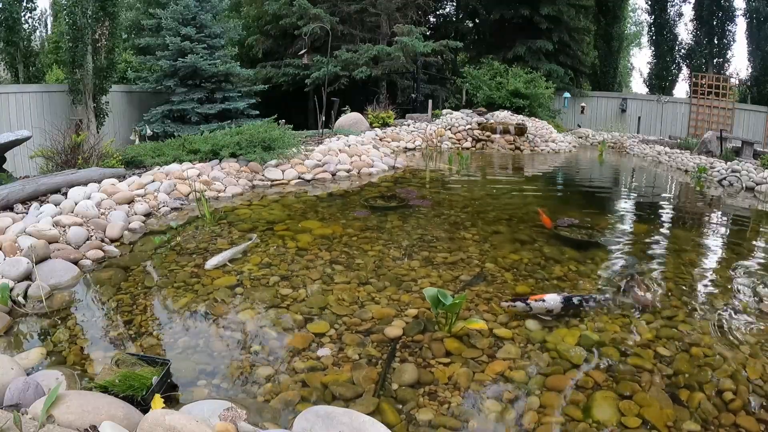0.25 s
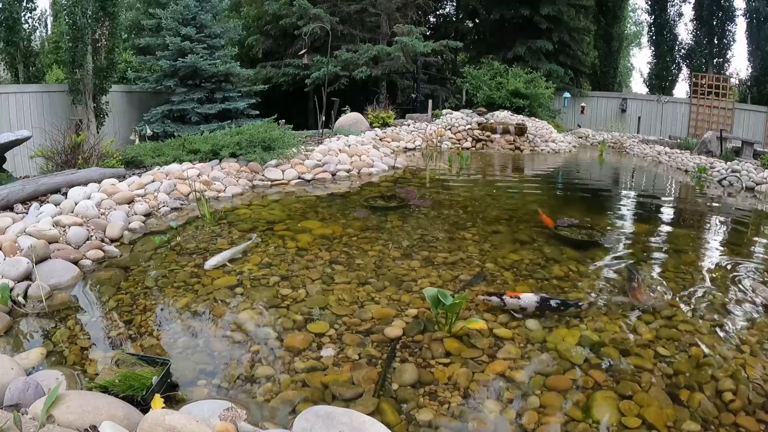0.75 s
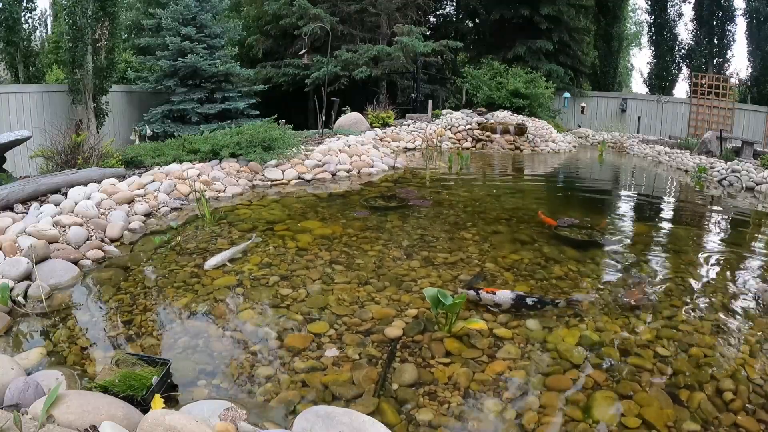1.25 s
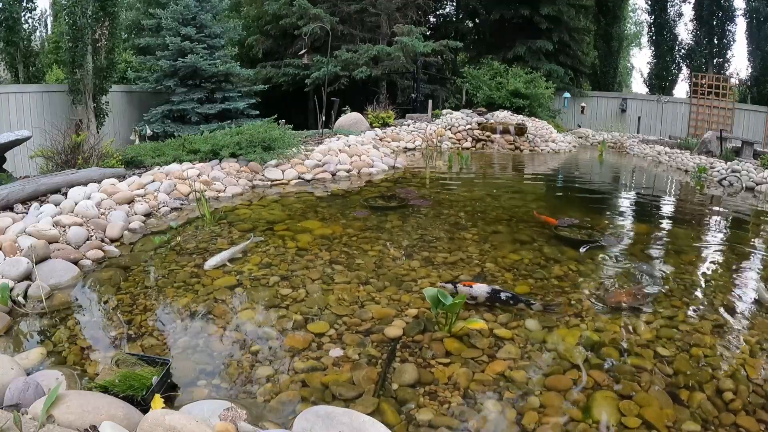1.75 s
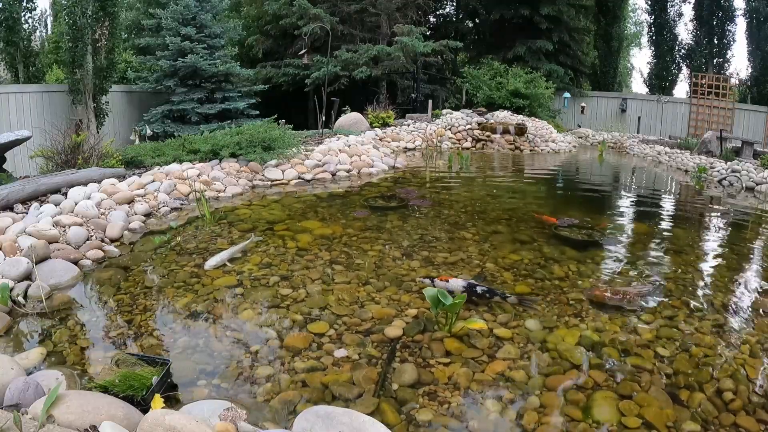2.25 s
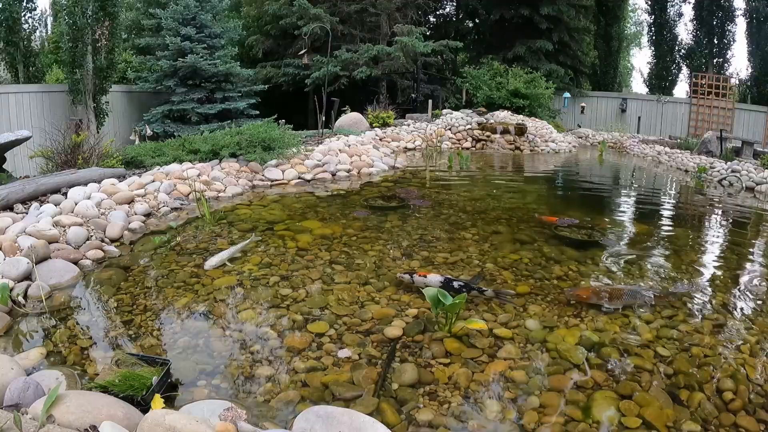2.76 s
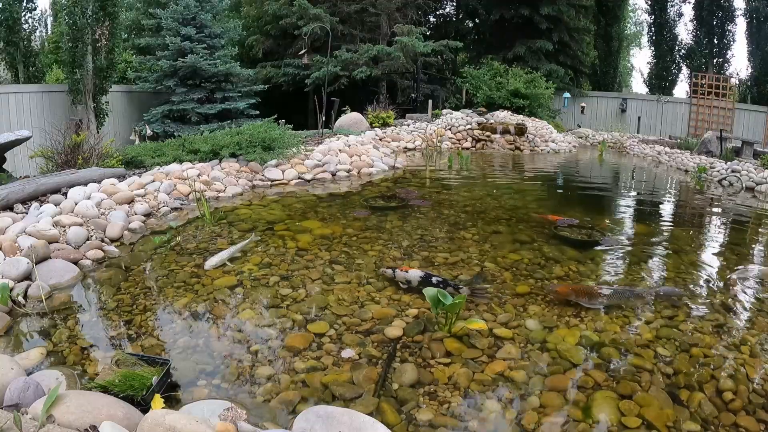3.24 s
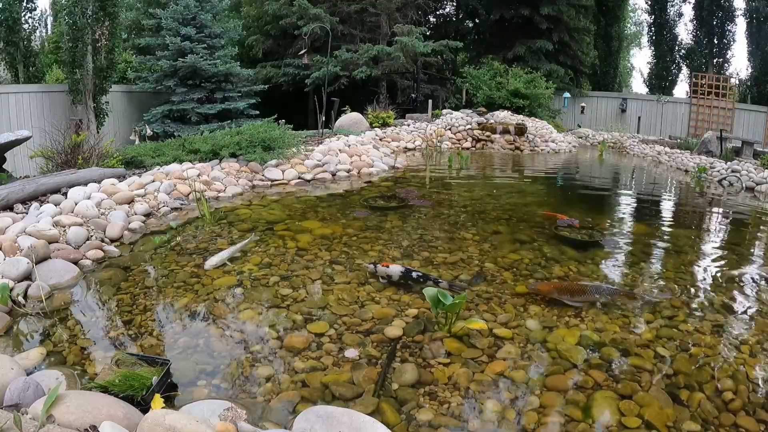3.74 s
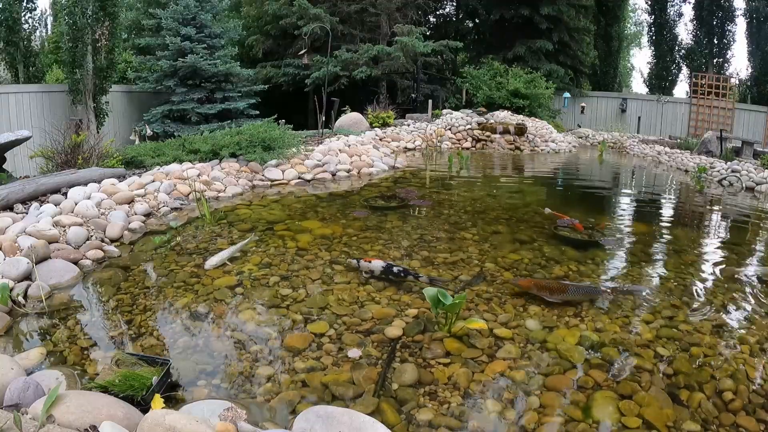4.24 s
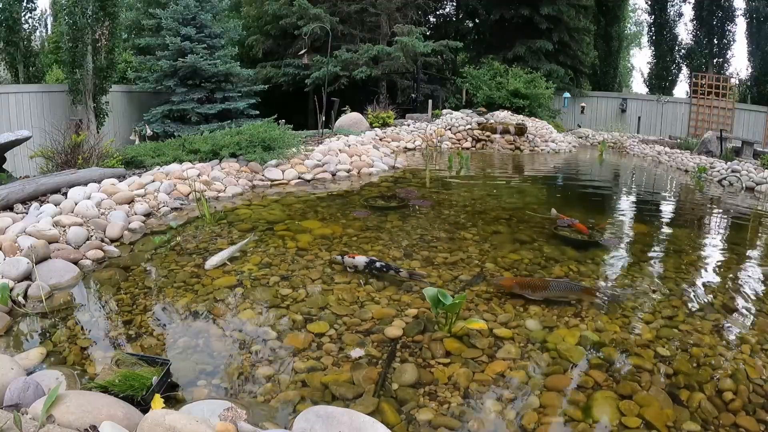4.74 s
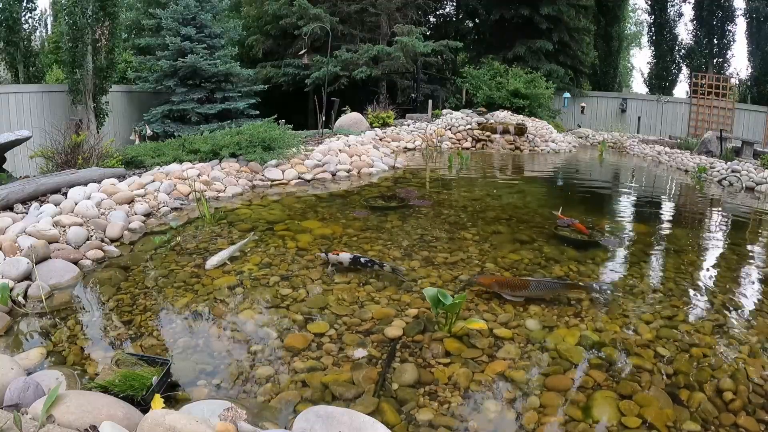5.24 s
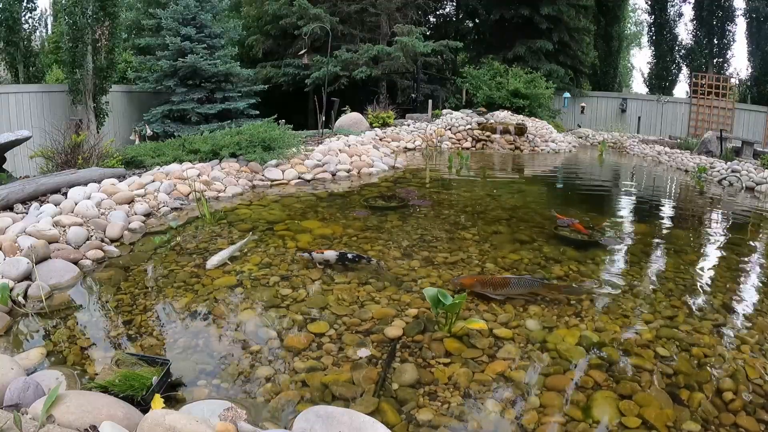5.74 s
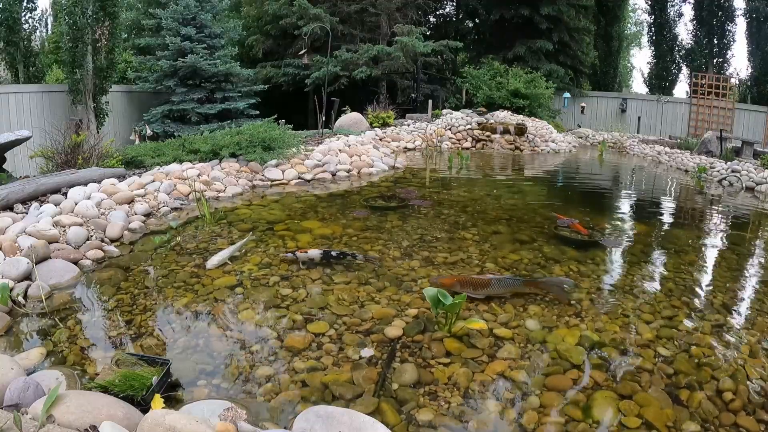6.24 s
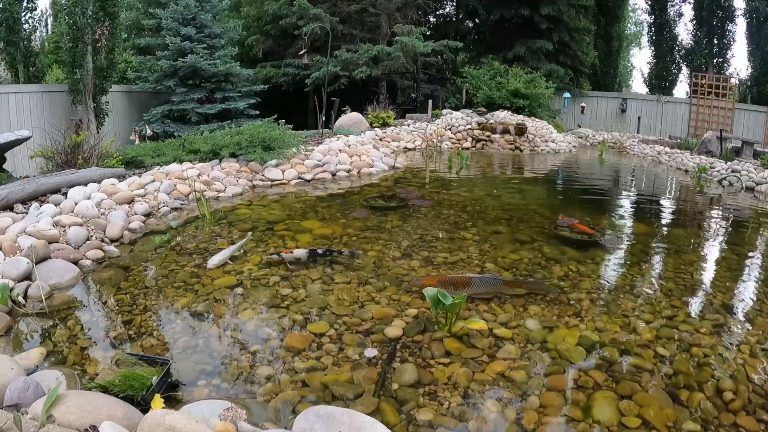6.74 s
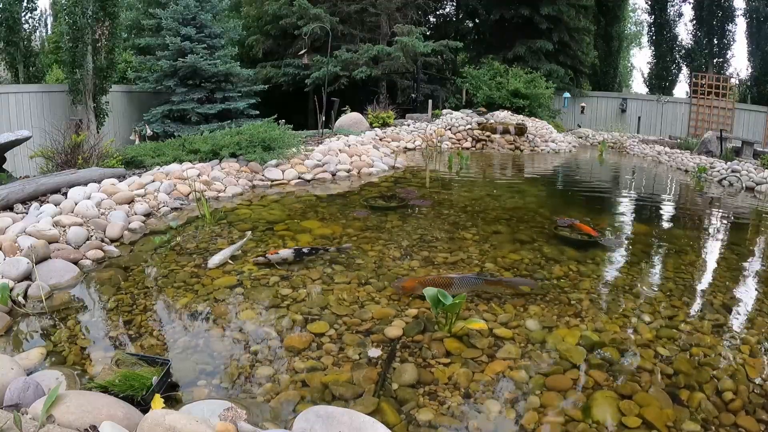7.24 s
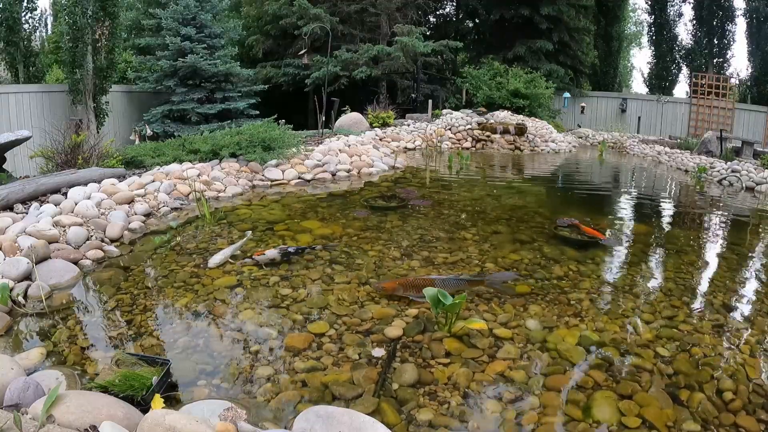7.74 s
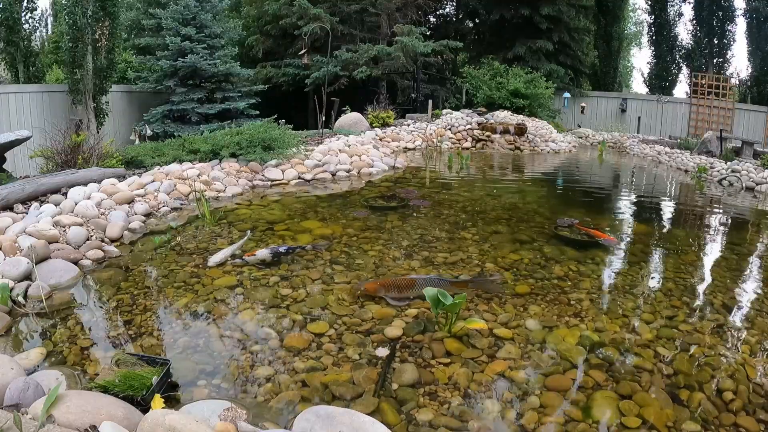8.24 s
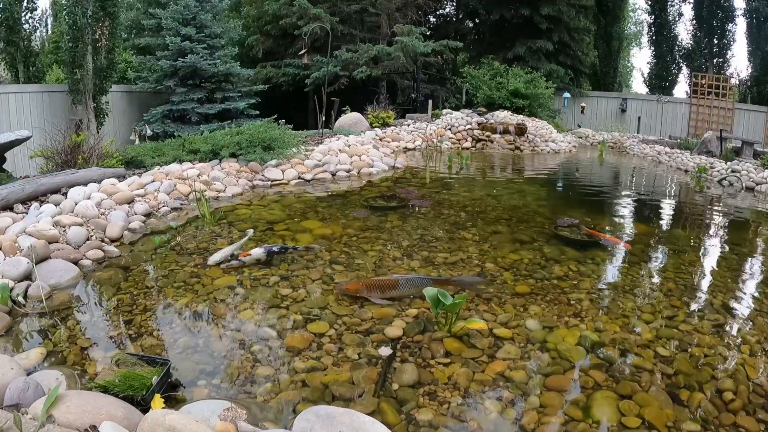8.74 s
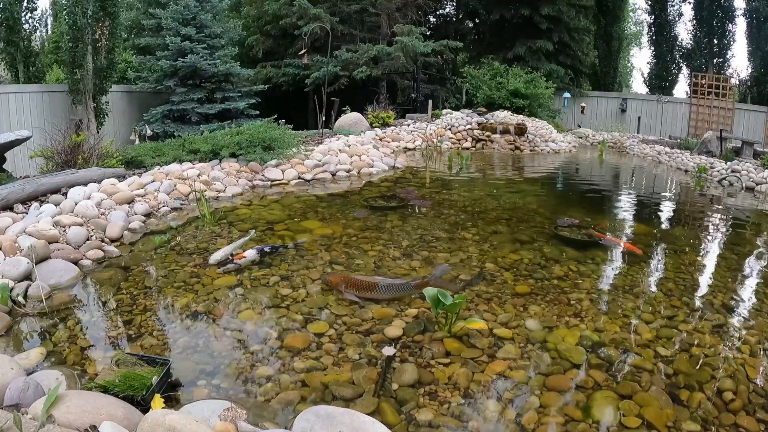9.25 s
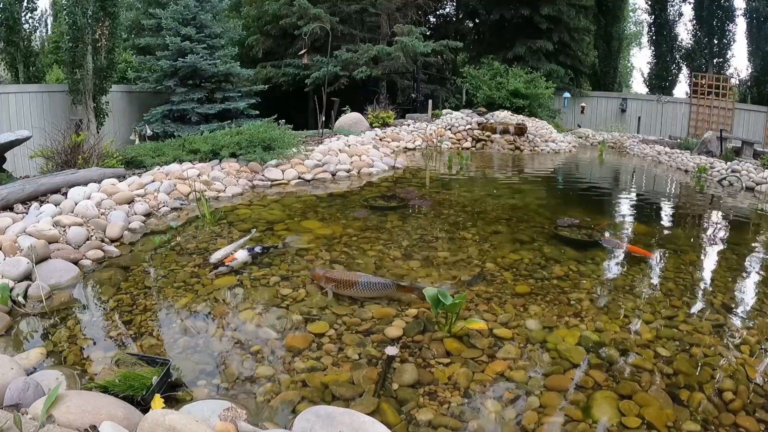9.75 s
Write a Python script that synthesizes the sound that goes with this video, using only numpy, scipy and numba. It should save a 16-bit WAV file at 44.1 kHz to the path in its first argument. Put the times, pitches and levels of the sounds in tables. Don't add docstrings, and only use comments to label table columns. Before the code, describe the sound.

Unbroken splashing of a little garden cascade, bright droplets and bubbly plops standing out, over low, uneven wind buffeting against the microphone.

```python
import sys
import numpy as np
from scipy import signal
from scipy.fft import rfft, irfft, next_fast_len
from scipy.io import wavfile
from scipy.ndimage import uniform_filter1d, map_coordinates
from numba import njit

SR = 44100
rng = np.random.default_rng(int(sys.argv[2]) if len(sys.argv) > 2 else 0)


def convert_level_to_amplitude(level_db):
    exponent = np.asarray(level_db, float) / 20
    return 10 ** exponent


def digitize_waveform(pressure):
    field = np.atleast_2d(pressure).T
    bounded = np.clip(field, -1, 1)
    quanta = np.round(bounded * 32767).astype(np.int16)
    wavfile.write(sys.argv[1], SR, quanta)


N = 440559

# pitch_hz, level_db (per Hz)
SPRAY_COLOUR = [(2000, -20.5), (3400, -4), (5580, -6), (8230, -17.5), (12000, -25.5), (13700, -33),
                (14900, -48)]


def waterfall():
    # middle_s, change_db (over the steady flow)
    gushes = [(1.5, 4), (1.58, 1), (1.69, -3.5), (1.78, 2), (2.0, 1.5), (2.28, 2), (2.84, 1.5),
              (3.066, -1.5), (3.25, 1), (3.92, 1), (4.9, 0.5), (5.06, 3.5), (5.73, 3.5), (7.02, -1.5),
              (7.51, -1.5), (7.73, 2.5), (8.24, 0.5), (8.93, 1), (8.97, -2.5), (9.88, -1), (9.93, 4.5)]
    # pitch_hz, level_db (per Hz)
    splash_colour = [(250, -40), (450, -4), (720, -4.5), (910, -0.5), (1080, -2), (1230, 0.5), (1420, -2),
                     (1950, 0.5), (2340, -4), (2570, -2), (2800, -5.5), (3500, -8), (5000, -20),
                     (9000, -59)]
    splash_db, spray_db = -40.5, -48.5
    gush_db = swells(*np.transpose(gushes), half_s=0.016)
    surge = wobble(24) + 0.3 * wobble(55) + 1.1 * wobble(130)

    bubbles = crowd(count=18000, lo_hz=446.6, hi_hz=5180, cycles=4.28, spread_db=2.3,
                    clump_db=1.8 * surge, rise=0.13)
    bells = crowd(count=2500, lo_hz=704.7, hi_hz=9016, cycles=13.1, spread_db=2.3,
                  clump_db=1.0 * surge, rise=0.0677)
    fizz = crowd(count=16000, lo_hz=3215, hi_hz=14700, cycles=5.6, spread_db=2.0,
                 clump_db=2.2 * surge, rise=0.035)
    when, big = rng.random((1500, 2)).T
    crackle = unit(slaps(when * (N - 1) / SR, -3.2 * np.log(1.005 - big), t60=0.0058))

    splash = convert_level_to_amplitude(-3.5) * bubbles + convert_level_to_amplitude(-9) * bells + convert_level_to_amplitude(-11) * crackle
    splash += convert_level_to_amplitude(0.13 * surge) * patchy(0.69)
    splash = steadied(coloured(splash, splash_colour), seconds=0.095, share=0.35)
    spray = convert_level_to_amplitude(-4.5) * fizz + convert_level_to_amplitude(-10) * bells + convert_level_to_amplitude(-6.5) * crackle
    spray += convert_level_to_amplitude(0.25 * surge) * patchy(1.0)
    spray = steadied(coloured(spray, SPRAY_COLOUR), seconds=0.15, share=0.5)
    return convert_level_to_amplitude(splash_db + gush_db) * splash + convert_level_to_amplitude(spray_db + 0.086 * gush_db) * spray


def plops():
    # start_s, peak_db, pitch_hz, slap_db (above peak)
    big_bubbles = [(8.789, -29, 1050, 1), (0.402, -23, 1065, -5), (0.678, -24, 1210, 1),
                   (0.871, -20.5, 2500, -11), (8.232, -28, 1300, -10), (1.566, -23, 1210, -10),
                   (1.585, -19, 2180, -1), (1.995, -19.5, 2160, -4), (2.13, -22, 1840, -6),
                   (2.627, -26, 900, 3), (2.816, -25, 926, -6), (3.362, -24.5, 1090, 0),
                   (3.456, -23, 1105, -16), (3.57, -20.5, 1174, -12), (3.905, -24, 870, -1),
                   (3.976, -22.5, 2540, -5), (4.069, -22, 1770, -2), (4.163, -23, 1680, -5),
                   (4.864, -24, 1980, -8), (5.181, -23, 1940, -12), (5.444, -19.5, 2530, -9),
                   (6.369, -20, 1870, -9), (6.615, -23, 1940, -2), (7.035, -19.5, 1760, -2),
                   (7.509, -14, 880, -9), (8.218, -20, 2060, -10), (8.876, -23, 1150, -12),
                   (9.196, -22.5, 1190, -1), (9.374, -24, 1180, -9), (9.723, -24, 1340, 2)]
    # pitch_hz, level_db (per Hz)
    slap_colour = [(500, -52), (1000, 9), (2000, -4.5), (4000, -6), (9000, -40)]
    s, db, hz, slap_db = np.transpose(big_bubbles)
    t60 = 0.042 * (1000 / hz)
    life = np.clip(t60, .005, .2) / np.log(1000)
    rise = 0.092 * np.clip((-17.5 - db) / 6, .15, 1)
    ringing = ring(N, SR, s, hz, convert_level_to_amplitude(db - 6.5), life, rise, 0.15)
    slapping = slaps(s, db + slap_db + 2.5, t60=0.011)
    return ringing + filtered(slapping, lambda hz: convert_level_to_amplitude(along(slap_colour, hz)))


def ticks():
    # start_s, peak_db, pitch_hz
    droplets = [(0.19, -14, 3070), (4.065, -24, 2700), (0.7836, -19, 3650), (1.978, -18, 3030),
                (2.254, -16, 3160), (2.588, -25, 2880), (2.759, -17, 3470), (3.387, -15, 3010),
                (3.414, -15, 3050), (3.6013, -17, 5100), (3.7, -17, 3770), (4.6917, -19, 3670),
                (5.0734, -15.5, 4170), (5.3756, -15, 4470), (5.7274, -16, 2870), (5.9529, -18, 4520),
                (6.8367, -19, 3540), (7.026, -18, 4240), (7.043, -12.5, 3380), (7.254, -13, 3150),
                (8.08, -20, 2980), (8.419, -17, 4510), (8.5779, -17, 3000), (8.7166, -22, 3290),
                (8.792, -14, 4040), (8.8176, -20, 3680), (9.1855, -21, 2980), (9.5347, -19, 3330),
                (9.761, -17, 3150), (9.846, -15, 5760)]
    # start_s, peak_db
    sparks = [(0.1789, -47), (0.4692, -45), (1.4191, -49), (1.8511, -41), (2.108, -44), (2.7226, -44),
              (3.012, -46), (3.0723, -43), (3.1526, -49), (3.45, -46), (3.5567, -48), (4.4432, -42),
              (5.0897, -45), (5.2199, -38), (5.3087, -43), (5.9692, -48), (6.5579, -44), (6.8363, -36),
              (7.149, -51), (7.6843, -50), (7.9243, -47), (7.9871, -48), (8.063, -48), (8.3847, -50),
              (8.5783, -44), (9.0647, -39), (9.192, -47), (9.2268, -49)]
    # pitch_hz, level_db (per Hz)
    mist_colour = [(5000, -18), (8000, 6), (12000, -7), (15000, -18)]
    s, db, hz = np.transpose(droplets)
    ringing = ring(N, SR, s, hz, convert_level_to_amplitude(db - 8.0), 3.3 / hz, 0 * hz, 0.83)
    slapping = filtered(slaps(s, db - 5.0, t60=0.0054), lambda hz: convert_level_to_amplitude(along(SPRAY_COLOUR, hz)))
    s, db = np.transpose(sparks)
    bursting = filtered(slaps(s, db + 7.5, t60=0.0045), lambda hz: convert_level_to_amplitude(along(mist_colour, hz)))
    return ringing + slapping + bursting


def wind():
    # time_s, strength_db, sharpness_db (flutter over buffet)
    gusts = [(0, -30, -9.5), (.45, -30, -8), (.8, -25.5, -11), (1.2, -33, -1.5), (1.8, -31.5, -3),
             (2.3, -34, -2), (2.95, -34, -8.5), (3.4, -32, -6.5), (4.1, -31.5, 0), (4.6, -33.5, -3),
             (5.1, -41, -4), (5.55, -32, -8), (5.95, -28, -6), (6.45, -38, -3.5), (6.7, -25.5, -11),
             (7.2, -29, -9), (8.1, -28, -9), (9.99, -31.5, -8.5)]
    # middle_s, change_db (over the wind)
    eddies = [(.53, 4), (.59, -14), (.89, 4), (.95, -2.5), (1.62, -2.5), (1.87, 2), (2.28, -6), (2.39, 5),
              (2.87, -4), (3.34, 6.5), (3.73, 3), (3.95, -3), (4.0, 9.5), (4.23, 1.5), (4.78, 7),
              (4.87, -5), (5.03, 6), (5.81, -8), (5.86, 2.5), (6.29, 9), (6.59, 4), (6.73, 2), (6.79, -13),
              (6.87, 0.5), (7.37, 0.5), (7.43, -2), (8.07, 5.5), (8.12, -6), (8.68, -12), (8.76, 3.5)]
    # middle_s, change_db (over the flutter)
    flares = [(.61, 8), (.78, 4), (1.5, 4), (1.7, -4.5), (2.2, -9), (2.73, -7), (3.39, 7), (3.62, -17),
              (3.73, 4.5), (3.84, 4), (3.92, 0), (4.35, 5.5), (5.93, 2.5), (6.59, 5), (6.76, -10),
              (7.03, 6), (7.15, -1), (7.65, -2), (8.46, -2), (8.57, -9), (8.8, 3), (9.68, -4)]
    # pitch_hz, level_db (per Hz)
    buffet_colour = [(12, -49), (24, -8), (33, -2.5), (43, 2.5), (58, -4), (75, -0.5), (115, -7),
                     (160, -14), (210, -31.5), (350, -120)]
    # pitch_hz, level_db (per Hz)
    flutter_colour = [(65, -15), (110, -0.5), (204, -8), (286, -22.5), (450, -27.5), (580, -41),
                      (990, -120)]
    strength_db, sharp_db = curves(gusts)
    eddy_db = swells(*np.transpose(eddies), half_s=0.022)
    flare_db = swells(*np.transpose(flares), half_s=0.024)

    buffet = steadied(coloured(rng.standard_normal(N), buffet_colour), seconds=0.081, share=0.86)
    buffet_db = strength_db + eddy_db + 0.84 * wobble(5) + 1.0
    flutter = steadied(coloured(rng.standard_normal(N), flutter_colour), seconds=0.14, share=0.3)
    flutter_db = strength_db + sharp_db + 0.072 * eddy_db + flare_db + 0.99 * wobble(7.6)
    rumble = convert_level_to_amplitude(buffet_db) * buffet + convert_level_to_amplitude(flutter_db) * flutter
    return rumble * convert_level_to_amplitude(np.array([[.24], [-.24]]))


def whoosh():
    # middle_s, change_db (over the lightest air), half_length_s
    sweeps = [
        (0.102, 10, 0.24),
        (0.795, 9, 0.13),
        (1.304, 12, 0.33),
        (2.296, 4.5, 0.42),
        (2.85, 3.5, 0.079),
        (3.35, 2, 0.088),
        (4.2, 6.5, 0.6),
        (5.92, 5.5, 0.22),
    ]
    # pitch_hz, level_db (per Hz)
    air_colour = [(150, -1), (260, 6), (450, -3.5), (650, -7), (1000, -29), (1600, -120)]
    lightest_db = -52
    return convert_level_to_amplitude(lightest_db + swells(*np.transpose(sweeps))) * coloured(patchy(1.8), air_colour)


def ports(x):
    # pitch_hz, likeness (0 to 1)
    alike = [(200, .96), (400, .94), (750, .9), (1500, .93), (3000, .92), (4200, .97), (6500, .94),
             (7200, .68), (8200, .58), (10000, .68), (11200, .86), (12000, .58), (14500, .6)]
    # pitch_hz, level_db
    lean = [(100, .45), (450, 1.1), (800, -1.1), (1700, -3.2), (1950, -1.9), (2300, -3.4), (2650, -1),
            (3200, -2.6), (4300, -.4), (5300, -1.8), (6600, -.4), (8500, -3), (11500, 1.8), (13500, -1.1)]
    # pitch_hz, lead_radians
    lead = [(100, 0), (900, -.45), (1400, -.45), (1750, -.2), (3000, -.22), (3900, -.04), (6700, -.07),
            (7450, -.45), (9400, .32), (11200, .04), (12000, .3), (13000, 0)]
    z = signal.stft(x, nperseg=256)[2]
    random_phase = np.exp(2j * np.pi * rng.random(z.shape))
    scattered = signal.istft(z * random_phase, nperseg=256)[1][:N]
    scattered = scattered * np.std(x) / np.std(scattered)

    def shares(hz):
        turn = np.arccos(np.clip(along(alike, hz), 0, 1)) / 2
        return np.array([np.cos(turn), np.sin(turn)])

    def tilts(hz):
        tilt = convert_level_to_amplitude(along(lean, hz) / 2) * np.exp(.5j * along(lead, hz))
        return np.array([tilt, 1 / tilt])

    mid, side = filtered(np.array([x, scattered]), shares)
    return filtered(np.array([mid + side, mid - side]), tilts)


def crowd(count, lo_hz, hi_hz, cycles, spread_db, clump_db, rise):
    when, pitch, big, long = rng.random((count, 4)).T
    s = when * (N - 1) / SR
    hz = lo_hz * (hi_hz / lo_hz) ** pitch
    size_db = clump_db[(s * SR).astype(int)] - spread_db * np.log(1.006 - big)
    life = cycles * (0.4 + 0.966 * long) / hz
    return unit(ring(N, SR, s, hz, hz * convert_level_to_amplitude(size_db), life, 2 * rise * long, 0.37))


@njit
def ring(n, sr, s, hz, size, life, rise, onset):
    out = np.zeros(n)
    for g in range(len(s)):
        first = int(s[g] * sr)
        for i in range(min(int(5 * life[g] * sr) + 2, n - first)):
            t = i / sr
            turn = hz[g] * t * (1 + rise[g] * t / (2 * life[g]))
            loudness = size[g] * np.exp(-t / life[g]) * (1 - np.exp(-turn / onset))
            out[first + i] += loudness * np.sin(2 * np.pi * turn)
    return out


def slaps(s, db, t60):
    t = np.arange(SR // 50) / SR
    shape = convert_level_to_amplitude(db[:, None] - 60 * t / t60) * (1 - np.exp(-t / 0.00017))
    puffs = shape * rng.standard_normal((len(s), len(t)))
    places = (s * SR).astype(int)[:, None] + np.arange(len(t))
    return np.bincount(places.ravel(), puffs.ravel(), N + SR)[:N]


def patchy(patchy_db):
    z = signal.stft(rng.standard_normal(N + 512), nperseg=256)[2]
    field = uniform_filter1d(rng.standard_normal(z.shape), 8, 0)
    field = uniform_filter1d(field, 8, 1)
    return unit(signal.istft(z * convert_level_to_amplitude(patchy_db * unit(field)), nperseg=256)[1][:N])


def swells(s, db, half_s):
    t = np.arange(0, N, 64) / SR
    bells = np.exp(-.5 * ((t - s[:, None]) / np.reshape(half_s, (-1, 1))) ** 2)
    return np.interp(np.arange(N) / SR, t, db @ bells)


def steadied(x, seconds, share):
    power = np.abs(uniform_filter1d(x ** 2, int(seconds * SR)))
    return unit(x / (power + 0.11) ** (np.clip(share, 0, 1) / 2))


def wobble(rate):
    return map_coordinates(rng.standard_normal(4000), [np.arange(N) * rate / SR])


def curves(rows):
    s, *cols = np.transpose(rows)
    return [np.interp(np.arange(N) / SR, s, c) for c in cols]


def along(points, hz):
    f, v = np.transpose(points)
    return np.interp(np.log(hz + 1), np.log(f + 1), v)


def filtered(x, response):
    m = next_fast_len(N + 8192)
    return irfft(rfft(x, m) * response(np.fft.rfftfreq(m, 1 / SR)), m)[..., :N]


def coloured(x, spectrum):
    return unit(filtered(x, lambda hz: convert_level_to_amplitude(along(spectrum, hz))))


def unit(x):
    return x / np.sqrt(np.mean(x ** 2) + 1e-20)


def scene():
    water = waterfall() + plops() + ticks()
    return ports(water + whoosh()) + wind()


def band_limit(x):
    return signal.sosfilt(signal.butter(12, 15060, fs=SR, output="sos"), x)


def record(dry):
    return band_limit(dry)


dry = scene()
out = record(dry)
digitize_waveform(out)
```